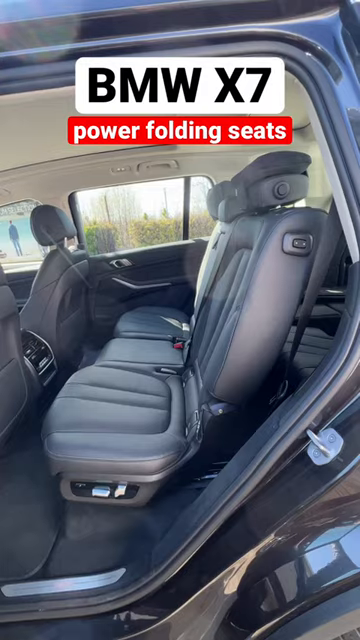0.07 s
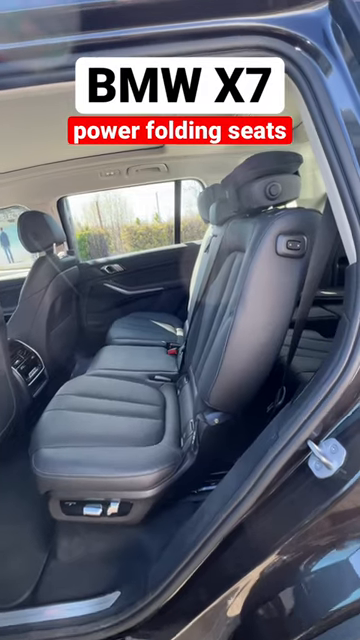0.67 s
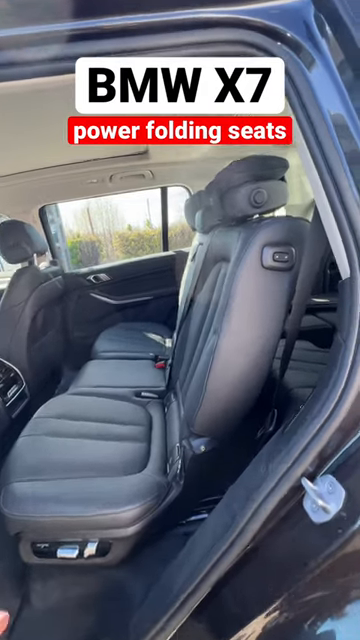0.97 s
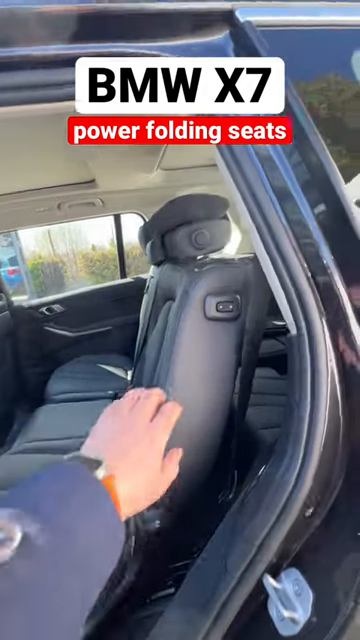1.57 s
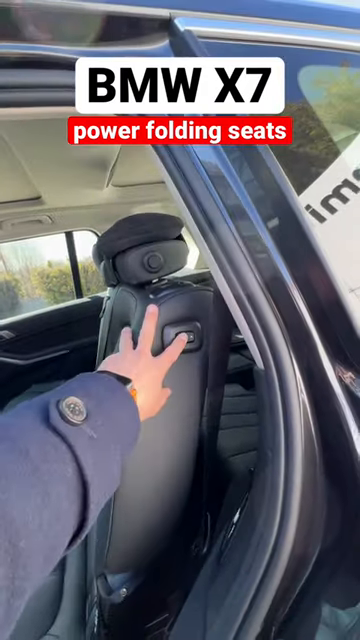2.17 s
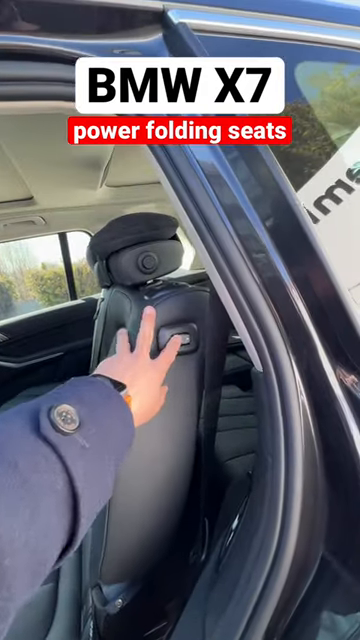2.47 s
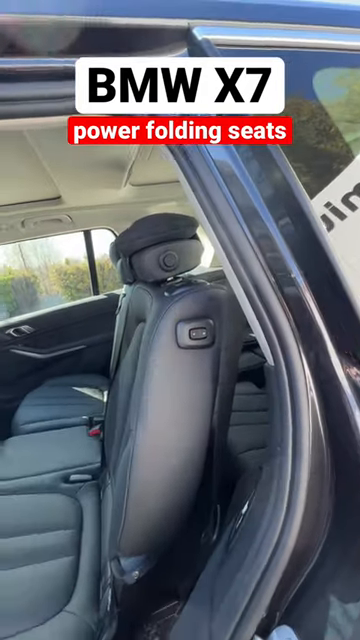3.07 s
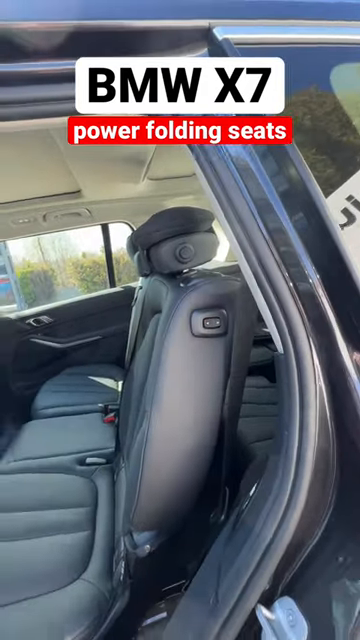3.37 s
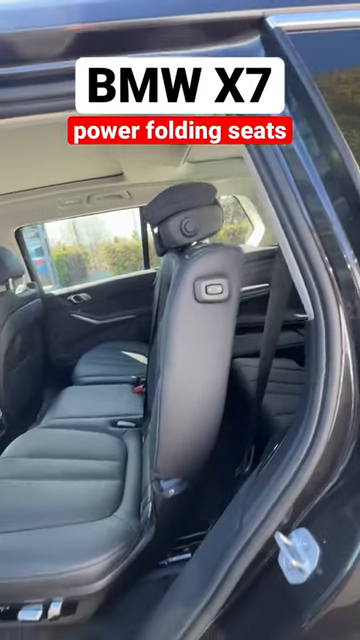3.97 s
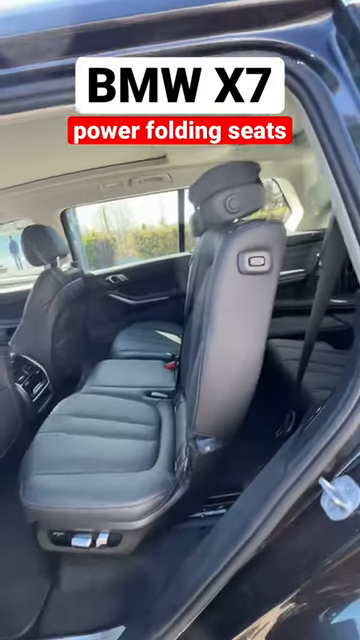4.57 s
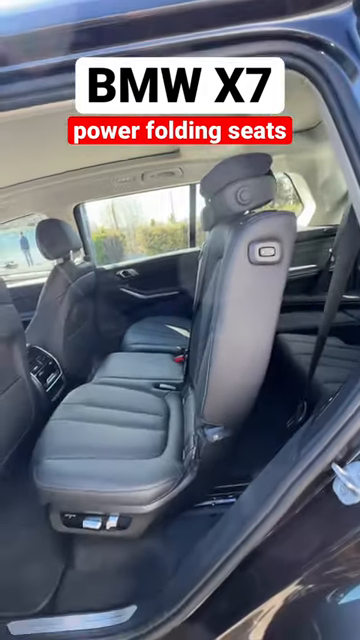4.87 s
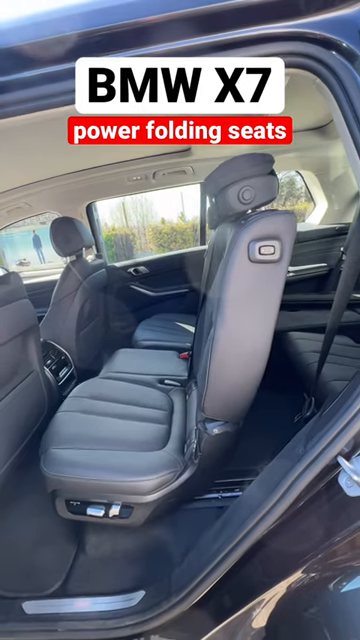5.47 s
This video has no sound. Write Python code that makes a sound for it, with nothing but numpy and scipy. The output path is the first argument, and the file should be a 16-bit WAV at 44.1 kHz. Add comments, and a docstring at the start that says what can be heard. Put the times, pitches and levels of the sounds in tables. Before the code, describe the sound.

An electric car seat motor drones steadily as the backrest leans and the seat slides, with soft clunks and outdoor rumble.

```python
"""A car's power seat hums, with far traffic and light wind coming through the open rear door.
Shoes scuff up on gritty paving, a sleeve swishes over the seat back, and the shoes step away.
The motor's hum sags under load; its three tones swell and fade as the microphone moves through
the cabin's loud and quiet spots (standing waves). Gears whine, plastic ticks and the seat knocks.
Once the backrest has leaned forward, a second motor spins up and the seat slides on hissing rails."""
import sys
import numpy as np
from scipy import signal
from scipy.fft import rfft, irfft
from scipy.io import wavfile
from scipy.ndimage import uniform_filter1d, map_coordinates

SR = 44100
rng = np.random.default_rng(int(sys.argv[2]) if len(sys.argv) > 2 else 0)


def pcm_store(signal):
    """Save signal as 16-bit PCM."""
    levels = np.round(np.clip(np.atleast_2d(signal), -1, 1) * 32767)
    wavfile.write(sys.argv[1], SR, levels.astype(np.int16).T)


N = 243431
T = np.arange(N) / SR

# Tone colour of the far road: pitch_hz, level_db
TRAFFIC_SPECTRUM = [(200, -2), (500, -4.5), (700, 2), (950, 4.5), (1300, 2.5), (1650, -1.5), (2000, -6.5),
                    (2500, -16), (3200, -24), (5000, -36), (10000, -59), (16000, -69.5)]
# Loudness of the road: time_s, level_db
TRAFFIC_LEVEL = [(0.1, -47), (1.05, -46.5), (1.45, -44), (2.1, -45), (2.8, -44.5), (3.2, -44), (3.55, -43),
                 (4.1, -44), (5.5, -46.5)]
# The road's echo off the car's side: time_s, delay_s, gain
PANEL_ECHO = [(0.2, 0.0042, .25), (0.7, 0.0031, .3), (1.3, 0.0025, .18), (2.3, 0.0008, .07),
              (3.1, 0.0013, .12), (3.8, 0.0027, .2), (4.9, 0.0032, .4), (5.5, 0.0031, .4)]
# Low rumble of the wind: pitch_hz, level_db
WIND_SPECTRUM = [(14, -57), (24, -34), (31, -20), (40, 1), (52, 5), (80, 2.5), (110, -4.5), (160, -9),
                 (250, -23), (600, -77.5)]
# Single gusts (pan is always left minus right): time_s, level_db, pitch_hz, width_s, pan_db
GUSTS = [(0.051, -30, 64, 0.0095, 1), (0.221, -32, 70, 0.021, -6), (3.339, -31.5, 74, 0.0048, -3),
         (3.59, -34, 69, 0.025, 2), (4.1, -33, 60, 0.02, 10), (4.28, -32, 63, 0.022, 2),
         (4.531, -27, 65, 0.026, 3), (4.878, -28, 71, 0.0078, 21), (4.936, -31.5, 72, 0.009, 23),
         (4.951, -36, 220, 0.004, 8), (5.286, -21.5, 55.7, 0.0074, 10), (5.324, -29.5, 160, 0.0065, 14.5),
         (5.343, -29.5, 109, 0.0084, 8), (5.364, -27.5, 85, 0.0088, -14), (5.47, -31.5, 63, 0.0067, 24),
         (5.473, -34, 229, 0.0033, 8), (5.489, -31, 70, 0.007, 12), (5.507, -28, 63.4, 0.005, 7)]
# Air churned up by a gust: pitch_hz, level_db
EDDY_SPECTRUM = [(40, -19), (90, 10.5), (200, 3.5), (320, -35), (700, -63), (3000, -100)]
# Shoe scuffs: start_s, level_db, rise_s, slide_s, treble_tilt_db_per_octave, pan_db
SCUFFS = [(0.195, -59, 0.017, 0.043, -7, 10), (0.501, -49, 0.006, 0.015, 0.5, 0),
          (0.531, -50, .001, 0.0018, 0, 1), (0.599, -70, .015, 0.029, 1, 4),
          (0.629, -48, .003, 0.0088, -5.5, 1), (0.649, -47.5, 0.004, 0.01, 0, -3),
          (0.6603, -46, .0006, .001, 4, 14), (0.676, -52.5, 0.012, 0.042, 1, 7),
          (0.7432, -42.5, 0.0008, 0.0026, -5.5, 1), (0.751, -45, .0007, .001, 2, 5),
          (0.776, -53.5, 0.0065, 0.017, 2, 5), (0.855, -55, .002, 0.0019, -1, 3),
          (0.905, -48.5, 0.0016, 0.0026, -9, 1), (1.005, -40.5, 0.00097, 0.0016, 0, 1),
          (1.058, -54, 0.003, 0.0062, 0, 6), (1.2528, -47, 0.001, .003, -4, 5),
          (1.2635, -43, 0.00064, 0.0012, -0.5, 14), (1.279, -48.5, .001, .002, 1, 14),
          (1.353, -47, 0.0011, 0.0022, -4, 9), (1.366, -43, 0.0011, 0.0015, -1.5, 14),
          (1.52, -56, 0.004, 0.0068, -7, -2), (1.605, -62, .003, .003, 12, 0),
          (1.984, -51, 0.0071, 0.0029, -2, 16.5), (3.011, -59, .002, .005, -1, 6),
          (3.229, -54.5, 0.001, .003, 6, 3), (3.297, -51, 0.001, 0.0022, 5, 10),
          (3.329, -52.5, 0.001, .002, 1.5, 8), (3.374, -44, 0.0012, 0.0067, -3.5, 5),
          (3.49, -44.5, 0.00088, 0.0036, -0.5, 4), (3.493, -40, 0.0008, 0.0022, -6.5, -2),
          (3.504, -52, .0003, .0003, -3, 9), (3.835, -44, 0.015, 0.038, -5.5, 2),
          (3.897, -49.5, 0.021, 0.011, -3, 6), (3.955, -53.5, 0.0048, .004, 6.5, 4),
          (3.974, -51.5, .0005, 0.00041, 1, 6), (4.05, -59, .006, .015, -6, 1),
          (4.138, -57, .002, .003, -2, 0), (4.164, -53, 0.0033, .005, -6, 2),
          (4.381, -54, 0.0015, .001, 10, 2), (4.72, -57, .003, .003, -8, -3)]
# Tone colour of gritty rubbing: pitch_hz, level_db
GRIT_SPECTRUM = [(400, -16), (1200, 1), (2300, 7), (3500, 4), (4700, 3.5), (6200, 5.5), (9000, 4),
                 (11000, -1.5), (14000, -12.5), (16000, -13)]
# How much of a scuff's pan each pitch keeps: pitch_hz, share
GRIT_PAN_SHARE = [(8000, 0.72), (10000, 0.2), (12000, 0)]
# The sleeve's stroke over leather: time_s, hiss_db, rub_db
SLEEVE_STROKE = [(2.43, -105, -100), (2.5, -82, -93), (2.57, -70, -79), (2.66, -68, -72), (2.715, -58, -56),
                 (2.745, -72, -57), (2.775, -74, -77), (2.83, -105, -100)]
# Airy hiss of cloth: pitch_hz, level_db
SLEEVE_SPECTRUM = [(5000, -36), (9000, -5), (11500, -3), (15000, -5.5), (16000, -15)]
# Dry plastic ticks: time_s, level_db, pitch_hz, width_hz, pan_db, snap_db
TICKS = [(0.3124, -38, 9100, 1500, -16, -39), (0.3322, -55, 9200, 1400, -10, -53),
         (0.3388, -51, 9000, 1600, -12, -44), (0.3405, -53, 10000, 1300, -10, -54),
         (.3472, -46, 9100, 1300, -16, -47), (.3483, -35, 1900, 1300, 7, -35),
         (0.3488, -29, 1050, 520, 7, -45), (0.4037, -44, 9100, 1400, -2, -42),
         (0.4040, -41, 5200, 2000, 8, -42), (.4046, -33, 1000, 650, 6, -48),
         (2.2508, -54, 9400, 1300, -5, -43), (2.2520, -45, 3400, 1400, 5, -47)]
# Dull knocks in the seat back: start_s, level_db, pitch_factor, rise_s, pan_db
KNOCKS = [(0.349, -36.5, 1.08, 0.00095, 6), (2.253, -22.5, 0.69, 0.0016, -2),
          (3.385, -33.5, 0.85, 0.0009, -7), (3.402, -19, 0.684, 0.009, 0), (3.403, -18.5, 0.31, 0.004, 0),
          (3.838, -22, 1.23, 0.007, -3), (3.853, -24, 0.83, 0.0057, -6), (4.945, -29, 0.53, 0.0023, -8)]
# The seat back's ringing tones, scaled by each knock: pitch_hz, level_db, time_to_fade_60_db_s
SEAT_TONES = [(301, -3.5, 0.056), (458, 15.5, 0.013), (455, -37, 0.071), (890, -32, 0.011)]
# Hiss of the rails: pitch_hz, level_db
RAIL_SPECTRUM = [(1500, -37), (2500, -5.5), (3200, 7.5), (4500, 2.5), (6000, 3), (7000, 2), (8500, 4),
                 (9800, 2), (11000, -10.5), (13000, -14), (15600, -24)]
# That hiss leans left in the treble: pitch_hz, pan_db
RAIL_PAN = [(2700, -1), (4200, 6), (6400, 10.5), (7400, 3.5), (8800, 0), (15000, -0.5)]
# A very high shimmer on the rails: pitch_hz, level_db
SHEEN_SPECTRUM = [(9000, -31), (11300, -9), (12500, 11), (14600, 4), (15500, -14)]
# Loudness of the rails: time_s, level_db
RAIL_LEVEL = [(0.1, -76.5), (.45, -70.5), (.6, -66), (.83, -66), (.93, -62.5), (1.15, -66.5), (1.55, -63),
              (2.1, -67.5), (2.26, -75.5), (2.44, -75.5), (2.65, -69), (2.85, -65.5), (3.2, -71),
              (3.6, -61), (4.45, -63), (4.75, -61), (5.0, -63.5), (5.52, -63.5)]
# Drone of the seat frame: pitch_hz, level_db
FRAME_SPECTRUM = [(100, 2), (170, 6.5), (250, 8), (350, 0), (480, 5.5), (640, -0.5), (900, -59),
                  (2000, -53.5)]
# Where the gears whine: pitch_hz, width_hz, level_db
WHINE_BANDS = [(3720, 180, -3.5), (3480, 280, -8), (5800, 710, -10), (6900, 380, -12.5)]
# When load makes them whine: peak_s, level_db, rise_s, fall_s
WHINE_SWELLS = [(1.0, -68, 0.13, 0.15), (2.06, -65, 0.3, 0.14)]
# Weak tones of the drive: multiple_of_hum_pitch, leaning_db, sliding_db
DRIVE_TONES = [(3.64, -82, -64), (4.02, -64.5, -64), (4.06, -73, -59), (5.0, -72, -70.5), (6.01, -63, -79)]
# The main motor slows as its load grows: time_s, pitch_hz
HUM_PITCH = [(.7, 147.5), (1.4, 146.1), (3.0, 146.2), (3.6, 144.6), (4.3, 145), (5.0, 143.9), (5.5, 144.3)]
# Loudness of the hum's three tones, before a small trim: time_s, first_db, second_db, third_db
HUM_LEVELS = [(0.05, -30.5, -54, -74), (0.11, -29.5, -61, -72), (0.47, -29, -51.5, -66),
              (0.71, -34, -63, -56), (0.89, -32, -52, -48.5), (1.07, -41, -58, -50.5),
              (1.25, -33.5, -52, -52.5), (1.43, -36.5, -59, -58), (1.79, -28.5, -54.5, -63),
              (2.21, -29.5, -36, -45.5), (2.51, -31, -49, -50), (2.93, -36, -45.5, -64),
              (3.17, -37, -57, -49.5), (3.57, -49.5, -41, -48), (3.67, -38.5, -49, -44.5),
              (4.07, -31.5, -37.5, -43.5), (4.19, -33.5, -37.5, -40), (4.85, -33, -38.5, -43.5),
              (4.97, -28.5, -39, -46), (5.21, -30.5, -49, -49.5), (5.33, -44, -56, -57.5),
              (5.45, -38.5, -55.5, -56.5)]
# Where standing waves place each tone: time_s, first_pan_db, second_pan_db, third_pan_db
HUM_PANS = [(0.3, 0.5, -25, 45.5), (1.2, -3, -3, -19), (2.3, -2, 2, -5.5), (3.0, -1.5, 6.5, -13),
            (4.1, 0.5, 1.5, -7), (4.7, -1.5, -12.5, 9), (5.0, -0.5, -8.5, 1), (5.4, 0, -41.5, 34)]
# How far each tone's left wave runs ahead of its right: time_s, first_rad, second_rad, third_rad
HUM_LEADS = [(0.3, 0.15, 3.1, -0.8), (1.2, 0.11, 1.2, -0.5), (2.0, 0.48, 0.77, 2), (2.7, 0.35, 0.67, 2.5),
             (3.3, -0.016, 2.8, 2.8), (3.8, 0.83, 2.3, 4), (4.6, 0.39, 2.35, -1), (5.0, 0.65, 0.87, 2),
             (5.5, -1.8, 1.5, -3.5)]
# How alike left and right sound, wide near 11 kHz and nearly centred above: pitch_hz, likeness
STEREO_LIKENESS = [(30, 0.5), (100, 0.94), (200, 0.7), (380, 0.56), (540, -0.56), (760, -0.32),
                   (1050, 0.33), (1700, 0.31), (2250, -0.42), (2800, 0.011), (9500, 0.03), (11000, -1.11),
                   (12800, 0.7), (15500, 0.5)]
# Narrow dips made by the microphone's openings: pitch_hz, width_hz, left_db, right_db
MIC_NOTCHES = [(5340, 100, -6, -27.5), (7620, 290, -9, -15)]

SPIN_START_S, SPIN_UP_S = 3.17, 0.105  # the second motor starts and gathers speed
SLIDE_START_S, SLIDE_FULL_S = 3.4, 4.14


def amp(db):
    """Turns decibels into a gain."""
    return 10 ** (np.asarray(db) / 20)


def unit_level(x):
    """Scales a signal to an average power of 1."""
    return x / np.sqrt(np.mean(x ** 2) + 1e-20)


def curves(rows):
    """Joins each column of a table with straight lines over time."""
    times, *columns = np.transpose(rows)
    return [np.interp(T, times, column) for column in columns]


def at_pitch(table, hz):
    """Looks up a table's value at each pitch."""
    pitches, values = np.transpose(table)
    return np.interp(np.log(hz + 1), np.log(pitches + 1), values)


def panned(pan_db):
    """Left and right gains; a positive pan is louder on the left."""
    return amp(np.array([pan_db, -pan_db]).reshape(2, -1) / 2)


def add(mix, start_s, sound):
    """Mixes a sound in at the given time."""
    part = mix[:, max(round(start_s * SR), 0):][:, :sound.shape[1]]
    part += sound[:, :part.shape[1]]


def wander(rate_hz):
    """A random wobble of size 1, moving at up to about the given rate."""
    hz = np.fft.rfftfreq(N, 1 / SR)
    return unit_level(irfft(rfft(rng.standard_normal(N)) / (1 + (hz / rate_hz) ** 4), N))


def ripple(size, step_hz):
    """Echoes make some pitches randomly louder and others softer."""
    pitches = np.arange(0, SR / 2, step_hz)
    return np.interp(np.fft.rfftfreq(size, 1 / SR), pitches, rng.standard_normal(len(pitches)))


def colour(pair, spectrum, extra_db=0):
    """Gives two unrelated noises a tone colour and a left-right likeness (1 same, -1 opposite)."""
    size = pair.shape[1]
    hz, (a, b) = np.fft.rfftfreq(size, 1 / SR), rfft(pair)
    likeness = np.clip(at_pitch(STEREO_LIKENESS, hz), -1, 1)
    mid, side = a * np.sqrt(1 + likeness), b * np.sqrt(1 - likeness)
    gain = amp(at_pitch(spectrum, hz) + extra_db)
    return unit_level(irfft(np.array([mid + side, mid - side]) * gain, size))


def noise(spectrum, ripple_db=0):
    """Steady stereo noise with the given tone colour."""
    bumps_db = ripple_db * ripple(N, step_hz=45)
    return colour(rng.standard_normal((2, N)), spectrum, bumps_db)


def sliding():
    """0 while only the backrest leans, 1 once the whole seat slides."""
    return np.interp(T, [SLIDE_START_S, SLIDE_FULL_S], [0, 1])


def traffic():
    """Far tyres roar; their echo off the car's side shifts as the microphone moves."""
    level = amp(curves(TRAFFIC_LEVEL)[0] + 0.5 * wander(32))
    roar = noise(TRAFFIC_SPECTRUM, ripple_db=1.5)
    delay_s, gain = curves(PANEL_ECHO)
    echo = np.array([map_coordinates(side, [(T - delay_s) * SR], order=1) for side in roar])
    return unit_level(roar + gain * echo) * level * panned(3.5)


def wind(sheltered_db=-44, enter_s=0.79, leave_s=2.6, fall_db_per_s=7, rise_db_per_s=2):
    """Low wind rumbles, softest while the car's doorway shelters the microphone."""
    exposed_db = fall_db_per_s * np.maximum(enter_s - T, 0) + rise_db_per_s * np.maximum(T - leave_s, 0)
    return noise(WIND_SPECTRUM) * amp(sheltered_db + exposed_db + 0.3 * wander(8.5)) * panned(1)


def gusts(eddy_db=-18, eddy_s=0.075):
    """Each gust thumps the microphone's two sides out of step and churns the air."""
    out, t = np.zeros((2, N)), np.arange(-SR // 20, SR // 20) / SR
    eddies = noise(EDDY_SPECTRUM)
    for time_s, db, hz, width_s, pan_db in GUSTS:
        push = np.cos(2 * np.pi * hz * t + np.array([[0], [np.pi / 2]]))
        add(out, time_s + t[0], amp(db) * panned(pan_db) * np.exp(-(t / width_s) ** 2 / 2) * push)
        out += eddies * amp(db + eddy_db) * np.exp(-((T - time_s) / eddy_s) ** 2)
    return out


def shoes(cracks_per_s=260, crack_db=19, crunch_fade_s=0.042, tail_db=-11.5, tail_fade_s=0.16):
    """Grit crunches and single grains crack while a sole slides; a soft tail follows."""
    out, t = np.zeros((2, N)), np.arange(-SR // 10, SR // 4) / SR
    size = len(t)
    hz = np.fft.rfftfreq(size, 1 / SR)
    octaves = np.log2(np.maximum(hz, 1500))
    for start_s, db, rise_s, slide_s, tilt_db, pan_db in SCUFFS:
        clumps = amp(2.9 * unit_level(uniform_filter1d(rng.standard_normal(size), size=40)))
        cracks = amp(crack_db) * (rng.random(size) < cracks_per_s / SR) * rng.choice([-1, 1], (2, size))
        tone_db = tilt_db * octaves + 2.8 * ripple(size, step_hz=260)
        crunch = colour(clumps * rng.standard_normal((2, size)) + cracks, GRIT_SPECTRUM, tone_db)
        tail = colour(rng.standard_normal((2, size)), GRIT_SPECTRUM, tone_db)
        landing = np.exp(-(np.minimum(t, 0) / rise_s) ** 2)
        stopped_s = np.maximum(t - slide_s, 0)
        crunch *= amp(-60 * stopped_s / crunch_fade_s)
        tail *= amp(tail_db - 60 * stopped_s / tail_fade_s)
        sides = panned(pan_db * at_pitch(GRIT_PAN_SHARE, hz))
        add(out, start_s + t[0], amp(db) * irfft(rfft(landing * (crunch + tail)) * sides, size))
    return out


def sleeve():
    """Cloth hisses over leather, with a fuller rub at the end of the stroke."""
    hiss_db, rub_db = curves(SLEEVE_STROKE)
    hiss = noise(SLEEVE_SPECTRUM) * amp(hiss_db)
    rub = noise(GRIT_SPECTRUM) * amp(rub_db) * panned(3.5)
    return (hiss + rub) * amp(2 * wander(80))


def plastic_ticks(snap_s=0.00004, echo_db=-10, echo_fade_s=0.04):
    """Plastic parts touch with a snap and a tiny ring that scatters briefly in the cabin."""
    out, echo_t = np.zeros((2, N)), np.arange(SR // 4) / SR
    t = np.arange(-SR // 200, SR // 200) / SR
    for time_s, db, hz, width_hz, pan_db, snap_db in TICKS:
        tick = amp(db) * np.exp(-(2 * width_hz * t) ** 2) * np.sin(2 * np.pi * hz * t)
        tick += amp(snap_db) * np.exp(-(t / snap_s) ** 2)
        scatter = rng.standard_normal((2, len(echo_t))) * amp(-60 * echo_t / echo_fade_s)
        echo = amp(echo_db) * scatter / np.linalg.norm(scatter[0]) * panned(pan_db / 2)
        direct = (echo_t == 0) * panned(pan_db)
        add(out, time_s + t[0], signal.fftconvolve(tick[None], direct + echo, axes=1))
    return out


def seat_knocks():
    """Padded knocks make the seat back ring for a moment."""
    out, t = np.zeros((2, N)), np.arange(SR // 4) / SR
    for start_s, db, pitch_factor, rise_s, pan_db in KNOCKS:
        ring = sum(amp(tone_db - 60 * t / fade_s) * np.sin(2 * np.pi * hz * pitch_factor * t)
                   for hz, tone_db, fade_s in SEAT_TONES)
        add(out, start_s, amp(db) * panned(pan_db) * ring * (1 - np.exp(-t / rise_s)) / 2)
    return out


def rails_and_frame(turns, chatter_depth=0.09):
    """The rails hiss and the frame drones, both shaken once by every turn of the motor."""
    sides = panned(at_pitch(RAIL_PAN, np.fft.rfftfreq(N, 1 / SR)))
    hiss = irfft(rfft(noise(RAIL_SPECTRUM, ripple_db=1.8)) * sides, N)
    sheen_db = np.interp(T, [3.2, 3.7], [-28, -14])  # brighter as the seat gets under way
    sheen = amp(sheen_db) * noise(SHEEN_SPECTRUM, ripple_db=1.8)
    rails = (hiss + sheen) * amp(curves(RAIL_LEVEL)[0] + 1.1 * wander(9.8))
    frame = noise(FRAME_SPECTRUM) * amp(-48 + 2 * sliding() + wander(16)) * panned(3)
    chatter = 1 + chatter_depth * np.cos(2 * np.pi * turns)
    return chatter * (rails + frame)


def gear_whine():
    """The gears whine twice under load, in narrow bands of high noise."""
    whine = sum(amp(db) * np.array([wander(width_hz), wander(width_hz)]) * np.sin(2 * np.pi * hz * T)
                for hz, width_hz, db in WHINE_BANDS)
    load = sum(amp(db) * np.exp(-((T - peak_s) / np.where(T < peak_s, rise_s, fall_s)) ** 2)
               for peak_s, db, rise_s, fall_s in WHINE_SWELLS)
    return unit_level(whine) * load * panned(14)


def slide_motor(full_speed_hz=352, running_db=-55, strain_db=14, strain_s=0.2):
    """The second motor strains and stumbles as it spins up, then holds a faint, fluttering note."""
    age_s = np.maximum(T - SPIN_START_S, 0)
    speed = 1 - np.exp(-age_s / SPIN_UP_S)
    strain = np.exp(-(age_s / strain_s) ** 2)
    turns = np.cumsum(full_speed_hz * speed * (1 + 0.031 * strain * wander(25))) / SR
    level = speed * amp(running_db + strain_db * strain) * (1 + 0.45 * wander(35))
    return level * panned(-3) * np.sin(2 * np.pi * turns)


def main_motor(turns, trim_db=(-0.3, -3, -2), throb_hz=6.1, throb_peak_s=3.4):
    """The motor hums at 1, 2 and 3 times its turning rate, over weaker tones of the drive."""
    out = np.zeros((2, N))
    tones = zip(curves(HUM_LEVELS), curves(HUM_PANS), curves(HUM_LEADS))
    for k, (db, pan_db, lead) in enumerate(tones):
        phase = 2 * np.pi * ((k + 1) * turns + rng.random()) + np.array([lead, -lead]) / 2
        flutter = 1 + (0.1 * wander(11) if k == 0 else 0.24 * wander(31))
        if k == 2:  # the third tone throbs once both motors run
            throb_depth = 0.3 * np.clip((T - SPIN_START_S) / SPIN_UP_S, 0, 1)
            flutter += throb_depth * np.cos(2 * np.pi * throb_hz * (T - throb_peak_s))
        out += amp(db + trim_db[k]) * panned(pan_db) * flutter * np.sin(phase)
    for multiple, leaning_db, sliding_db in DRIVE_TONES:
        drift = 0.61 * np.array([wander(0.93), wander(2.1)])
        level = amp(leaning_db + (sliding_db - leaning_db) * sliding())
        out += level * np.sin(2 * np.pi * multiple * turns + drift)
    return out


def scene():
    """The main motor's turning drives the hum and chatter; the other sounds play around it."""
    turns = np.cumsum(curves(HUM_PITCH)[0] * (1 + 0.00061 * wander(2.66))) / SR
    machinery = main_motor(turns) + slide_motor() + rails_and_frame(turns) + gear_whine()
    outdoors = traffic() + wind() + gusts()
    return machinery + outdoors + shoes() + plastic_ticks() + seat_knocks() + sleeve()


def record(dry, low_cut_hz=32, high_cut_hz=15850, silence_s=0.0365, fade_s=0.002):
    """The sound opens after a brief silence, with two narrow dips and no deepest bass or top treble."""
    hz = np.fft.rfftfreq(N, 1 / SR)
    notch_db = sum(np.outer(sides_db, np.exp(-((hz - centre_hz) / width_hz) ** 2))
                   for centre_hz, width_hz, *sides_db in MIC_NOTCHES)
    low_cut = hz ** 3 / np.hypot(hz ** 3, low_cut_hz ** 3)
    heard = irfft(rfft(dry) * amp(notch_db) * low_cut, N)
    fades = np.clip(np.minimum(T - silence_s, T[-1] - T) / fade_s, 0, 1)
    high_cut = signal.firwin(511, high_cut_hz, window=("kaiser", 9), fs=SR)
    return signal.oaconvolve(heard * fades, high_cut[None], "same")


dry = scene()
out = record(dry)
pcm_store(out)
```